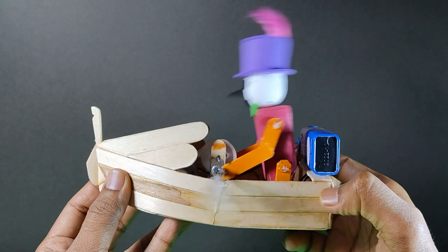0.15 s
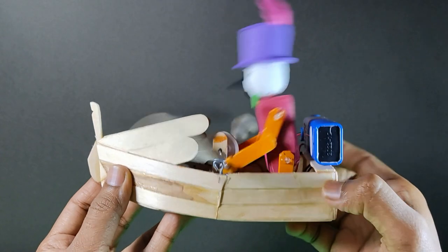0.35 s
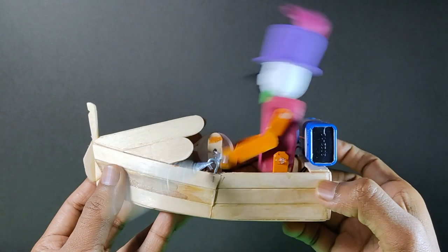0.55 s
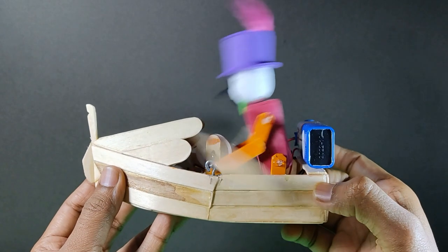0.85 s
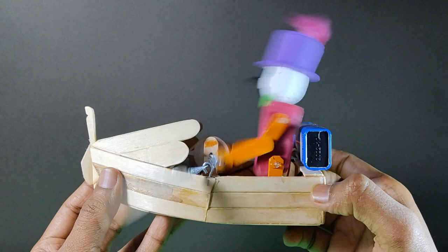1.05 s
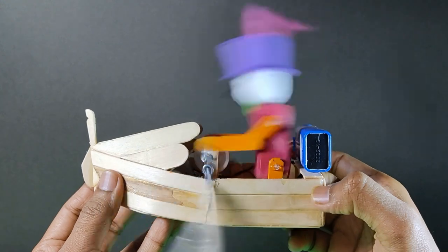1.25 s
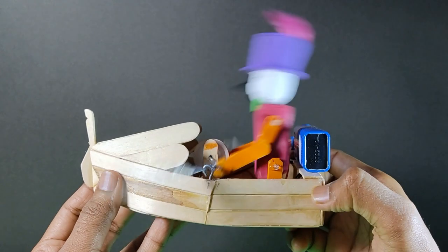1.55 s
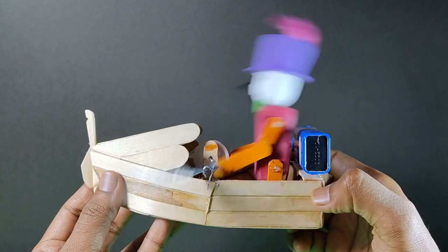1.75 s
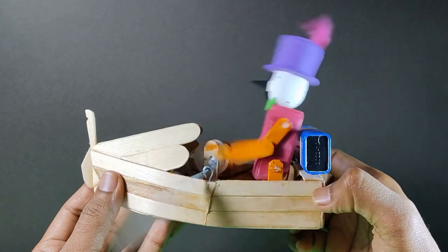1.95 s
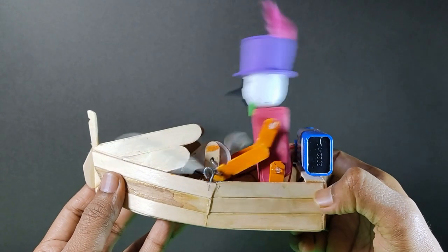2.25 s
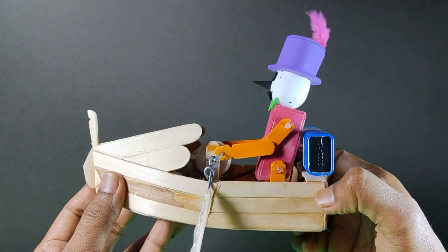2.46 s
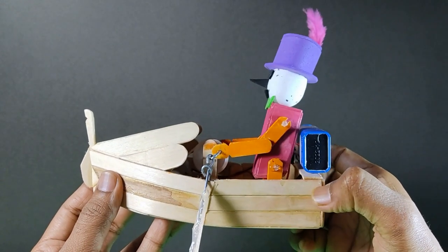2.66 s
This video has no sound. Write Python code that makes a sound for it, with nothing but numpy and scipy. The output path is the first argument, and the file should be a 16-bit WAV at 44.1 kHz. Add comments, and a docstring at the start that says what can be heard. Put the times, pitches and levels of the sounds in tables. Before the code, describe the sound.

After a brief quiet start, thin metallic ticks and light wooden knocks rattle about six times a second over soft low thuds, then cease, leaving faint room hiss; recorded close in a small room.

```python
"""A small room, with a wooden toy boat held in the hand before a microphone with two ports.
A small motor, a faint wavering hum, cranks a wire linkage that rows two paddles, then stops.
Twice a turn the loose joints chatter and tick: noise bursts, bare and through the ringing stick hull.
Arms and crank knock the hull's modes, and dull low thuds come as the paddles load it.
Random reflections make the room; the left port hears the toy 5 samples late, some 4 cm more path."""
import sys
import numpy as np
from scipy import signal
from scipy.fft import rfft, irfft
from scipy.io import wavfile
from scipy.ndimage import uniform_filter1d

SR = 44100
rng = np.random.default_rng(int(sys.argv[2]) if len(sys.argv) > 2 else 0)


def waveform_to_disk(signal):
    """Save audio, clipped to [-1, 1], as 16-bit WAV at the path in sys.argv[1]."""
    frames = np.transpose(np.atleast_2d(signal))
    scaled = np.clip(frames, -1, 1) * 32767
    samples = np.round(scaled).astype(np.int16)
    wavfile.write(sys.argv[1], SR, samples)


N = 123479


def amp(db):
    """Amplitude ratio of a level in dB."""
    return 10 ** (np.asarray(db) / 20)


def evened(x):
    """Scale to an RMS of 1."""
    return x / np.sqrt(np.mean(x ** 2) + 1e-20)


def smooth_noise(width):
    """Slow random drift of RMS 1: white noise averaged twice over width samples."""
    noise = rng.standard_normal(N)
    return evened(uniform_filter1d(uniform_filter1d(noise, width), width))


def read(points, hz):
    """Read a curve of (Hz, value) rows on a logarithmic frequency scale."""
    f, value = np.transpose(points)
    return np.interp(np.log(hz + 1), np.log(f + 1), value)


def colour(x, points, share=1):
    """Filter by a dB curve; minimum phase, so nothing sounds before its cause."""
    hz = abs(np.fft.fftfreq(4096, 1 / SR))
    log_gain = share * read(points, hz) * np.log(10) / 20
    response = np.exp(np.conj(signal.hilbert(log_gain)))
    taps = np.fft.ifft(response).real[:2048]
    return signal.oaconvolve(x, taps)[:N]


def lean(pair, points):
    """Tilt the stereo balance by a left-minus-right dB curve, half on each side."""
    return np.array([colour(pair[0], points, .5), colour(pair[1], points, -.5)])


def crossfade(hz):
    """Three steady cyclic gains, a third of a cycle apart, whose squares always add up to 1."""
    phase = hz * np.arange(N) / SR + np.arange(3)[:, None] / 3
    return np.cos(2 * np.pi * phase) * np.sqrt(2 / 3)


# Spectrum of the room air. Each row: frequency in Hz, relative density in dB.
AIR_SPECTRUM = [(12, -64), (20, 22.5), (32, -10.5), (65, -1), (158, -11), (248, -6.5), (293, -13),
                (337, -13), (872, -19.5), (1480, -15.5), (1800, -25), (2600, -21.5), (4410, -25.5),
                (7940, -10), (9930, -29), (16000, -68)]
# Likeness of the air at the two ports. Each row: frequency in Hz, correlation from 0 to 1.
AIR_LIKENESS = [(30, 0), (130, 0.9), (640, 0.26), (3000, 0.15)]
# Stereo balance of the air. Each row: frequency in Hz, left minus right in dB.
AIR_BALANCE = [(60, 1), (300, 6.5), (2000, 2), (6000, -7.5), (9000, -1)]
AIR_DB = -56  # RMS before the stereo balance


def air():
    """Quiet hiss and rumble of the room: shaped noise, more alike at the two ports where AIR_LIKENESS is high."""
    hz = np.fft.rfftfreq(N, 1 / SR)
    left, other = rfft(rng.standard_normal((2, N)))
    same = np.clip(read(AIR_LIKENESS, hz), 0, 1)
    right = same * left + np.sqrt(1 - same ** 2) * other
    noise = irfft(np.array([left, right]) * amp(read(AIR_SPECTRUM, hz)), N)
    return lean(amp(AIR_DB) * evened(noise), AIR_BALANCE)


# Low hum, likely the motor shaft. Each row: time in seconds, mean pitch in Hz, mean level in dB.
MOTOR_HUM = [(0.02, 163, -74), (0.13, 176.7, -79), (0.23, 169.4, -71), (0.44, 191.2, -79),
             (0.48, 183.2, -59.5), (0.57, 177, -84), (0.62, 176.7, -56.5), (0.73, 180.6, -63),
             (0.83, 178.2, -63), (1.1, 178.5, -68), (1.19, 166, -61), (1.26, 175, -78),
             (1.36, 173.9, -56.5), (1.46, 176.7, -72), (1.54, 171.2, -57), (1.599, 174.3, -84),
             (1.679, 188.6, -56), (1.76, 179.6, -76), (1.84, 185.7, -73), (1.87, 185.7, -49),
             (1.9, 178, -76), (1.999, 180.6, -70), (2.12, 177.3, -69), (2.27, 176.4, -65),
             (2.291, 173.3, -90), (2.369, 172, -62), (2.459, 183, -81), (2.52, 181.6, -66),
             (2.59, 174.2, -79), (2.78, 173, -73)]
HUM_WAVER_HZ, HUM_WAVER_DB = 8.9, 2.5  # RMS drift


def motor():
    """The shaft hum: one sine that wavers a little in pitch and level."""
    s, hz, db = np.transpose(MOTOR_HUM)
    t = np.arange(N) / SR
    pitch_drift, level_drift = smooth_noise(1000), smooth_noise(1000)
    pitch = np.interp(t, s, hz) + HUM_WAVER_HZ * pitch_drift
    level_db = np.interp(t, s, db) + HUM_WAVER_DB * level_drift
    return np.sqrt(2) * np.sin(2 * np.pi * np.cumsum(pitch) / SR) * amp(level_db)


# Modes of the stick hull. Each row: frequency in Hz, relative level in dB, 60 dB decay time in seconds.
HULL_MODES = [(463, -20, 0.072), (548.6, -27.5, 0.3), (661, -20.5, 0.16), (780.7, -19.5, 0.12),
              (1141.5, -6, 0.02), (1233, 4.5, 0.0096), (1400, -3.5, 0.021), (1496, 1, 0.014),
              (1843, -12, 0.047), (2130, -2, 0.015), (2536, -21.5, 0.11), (3000, -2, 0.0083),
              (3310, 4, 0.013), (3790, -1, 0.017)]
HULL_CUT_HZ = 687


def modes(t):
    """The hull's ring, one decaying sine a mode."""
    hz, db, t60 = np.transpose(HULL_MODES)[:, :, None]
    return amp(db - 60 * t / t60) * np.sin(2 * np.pi * hz * t)


def hull_cut(x):
    """Thin the lows of whatever sounds through the hull."""
    return signal.sosfilt(signal.butter(2, HULL_CUT_HZ, "high", fs=SR, output="sos"), x)


def hull(x):
    """Contacts land on ever different spots, each of which rings the modes in its own blend of signs."""
    ring = modes(np.arange(3000) / SR)
    spot = np.repeat(rng.integers(0, 8, N // 40 + 1), 40)[:N]  # a spot drawn every 40 samples
    blends = rng.choice([-1., 1.], (8, len(HULL_MODES))) @ ring / np.linalg.norm(ring)
    rung = sum(signal.oaconvolve(x * (spot == k), blend)[:N] for k, blend in enumerate(blends))
    return hull_cut(rung)


# Half turns of the crank, each a swell of chatter.
# Each row: start in seconds, hold in seconds, drive level in dB, hull drive against the bare drive in dB.
HALF_TURNS = [(0.226, 0.023, -67, 12), (0.352, 0.14, -31.5, -11.5), (0.559, 0.14, -38.5, -8.5),
              (0.721, 0.095, -31.5, -12.5), (0.907, 0.097, -29, -10), (1.088, 0.091, -32.5, -8),
              (1.248, 0.072, -26, -10), (1.417, 0.08, -30.5, -13.5), (1.58, 0.079, -37.5, -4.5),
              (1.771, 0.092, -32.5, -4.5), (1.952, 0.092, -32, -15), (2.146, 0.066, -33.5, -5.5),
              (2.304, 0.072, -28.5, -10.5), (2.487, 0.0093, -30.5, -1)]
RISE_S, FALL_DB_PER_S = 0.031, 338
LULL_S, LULL_WIDTH_S, LULL_DB = 0.064, 0.0098, -3  # slackens between the two jolts of a half turn


def swell():
    """Chatter level and hull share in dB: quick rise, hold with a lull, fall; the loudest swell wins."""
    t = np.arange(N) / SR
    start, hold, db, hull_db = np.transpose(HALF_TURNS)[:, :, None]
    since = t - start
    rise = 20 * np.log10(np.clip(since / RISE_S, 1e-4, 1))
    fall = FALL_DB_PER_S * np.maximum(since - hold, 0)
    lull = LULL_DB * np.exp(-((since - LULL_S) / LULL_WIDTH_S) ** 2)
    each = db + rise - fall + lull
    return each.max(0), hull_db[each.argmax(0), 0]


# Colour of the bare wire joints. Each row: frequency in Hz, gain in dB.
WIRE_COLOUR = [(60, -74.5), (150, -19), (300, -19.5), (600, -19.5), (1000, -11.5), (2500, -2.5),
               (4300, -7.5), (6000, -5), (9000, -6.5), (10500, -19), (11500, -25), (14000, -22.5),
               (16000, -32)]
CHATTER_PER_S, CHATTER_SPREAD_DB, CLUMP_DB = 1100, 7, 5


def chatter(level_db, hull_db):
    """Loose joints: random contacts in clumps, heard bare and through the hull."""
    strength = amp(CHATTER_SPREAD_DB * np.minimum(rng.exponential(1, N), 3))
    contacts = strength * (rng.random(N) < CHATTER_PER_S / SR) * rng.choice([-1., 1.], N)
    hits = evened(contacts * amp(CLUMP_DB * smooth_noise(160))) * amp(level_db)
    return colour(hits, WIRE_COLOUR) + hull(hits * amp(hull_db))


# Sharp ticks of the wire joints. Each row: start in seconds, relative level in dB.
WIRE_TICKS = [(0.164, -40), (0.2243, -27), (0.2352, -21.5), (0.239, -38), (0.251, -54), (0.2805, -19),
              (0.287, -57), (0.325, -33), (0.342, -34), (0.3752, -20), (0.392, -16.5), (0.412, -26),
              (0.424, -17), (0.432, -16.5), (0.445, -31), (0.4595, -17), (0.474, -25), (0.482, -41),
              (0.491, -42), (0.5532, -20), (0.5804, -25.5), (0.5936, -18), (0.605, -16.5), (0.613, -18),
              (0.648, -11), (0.67, -29), (0.6798, -21.5), (0.733, -23), (0.7637, -11), (0.7772, -16),
              (0.8119, -13.5), (0.8328, -22.5), (0.8417, -24), (0.898, -25), (0.9072, -26), (0.9297, -20.5),
              (0.9388, -17.5), (0.9458, -13), (0.9595, -15), (0.978, -34), (0.993, -25.5), (1.0114, -28),
              (1.045, -36), (1.0824, -20), (1.0997, -20), (1.115, -17.5), (1.1204, -14), (1.126, -13),
              (1.1621, -18), (1.166, -20), (1.18, -18.5), (1.19, -28.5), (1.2, -26), (1.2107, -40),
              (1.2859, -13.5), (1.2928, -21), (1.316, -31), (1.3398, -18.5), (1.366, -18.5),
              (1.3857, -22.5), (1.44, -37), (1.4552, -14), (1.462, -27), (1.4837, -19.5), (1.4955, -19.5),
              (1.5047, -17.5), (1.5324, -28), (1.5388, -25), (1.5772, -23), (1.598, -18), (1.615, -13.5),
              (1.6271, -15.5), (1.665, -14), (1.6845, -23), (1.722, -16.5), (1.765, -22.5), (1.7849, -27),
              (1.7935, -19), (1.802, -12), (1.8131, -17.5), (1.8521, -14), (1.8581, -18), (1.867, -42),
              (1.88, -24.5), (1.8876, -20.5), (1.9, -32), (1.9542, -26.5), (1.9798, -21), (1.9856, -21),
              (1.9959, -15), (2, -16.5), (2.0129, -14), (2.021, -37), (2.0377, -22), (2.0484, -14.5),
              (2.065, -30), (2.0892, -19.5), (2.1573, -28.5), (2.1621, -28), (2.175, -15), (2.1803, -20),
              (2.1915, -27), (2.2136, -20.5), (2.2216, -33), (2.2332, -22), (2.2518, -15), (2.328, -19),
              (2.3362, -14), (2.3493, -20), (2.361, -25), (2.3885, -12.5), (2.4041, -45), (2.4116, -23),
              (2.4245, -23), (2.4744, -20), (2.4941, -28), (2.5067, -11.5), (2.5264, -19), (2.542, -42),
              (2.7, -41), (2.7668, -43), (2.775, -56)]
TICK_S, TICK_DB, TICK_HULL_DB = 0.0012, -2, -13.5
BOUNCE_DB, BOUNCE_S = -13.5, 0.0076
LEAD_DB, LEAD_S, LOOSE_DB = -9.5, 0.0048, -39  # rattle round a tick, full once the chatter passes LOOSE_DB
DULL_HZ, DULL_DB, DULL_SPREAD_DB = 4800, -3.5, 2.5  # the part below DULL_HZ varies from tick to tick


def ticks(level_db):
    """Short bursts of contacts that rattle in and bounce out, some thin, some full; bare and through the hull."""
    out, t = np.zeros((2, N + 1800)), np.arange(-900, 900) / SR
    after = np.maximum(t, 0)
    bounce = amp(BOUNCE_DB) * np.exp(-after / BOUNCE_S) * np.minimum(after / (2 * TICK_S), 1) ** 2
    shape = np.exp(-(t / TICK_S - 1.5) ** 2) + bounce
    lead = amp(LEAD_DB) * np.exp(-abs(t) / LEAD_S)
    for s, db in WIRE_TICKS:
        at = round(s * SR)
        loose = amp(min(level_db[at] - LOOSE_DB, 0))
        contacts = np.sign(rng.standard_normal(1800))
        burst = amp(db + TICK_DB) * contacts * (shape + loose * lead)
        fullness = amp(DULL_DB + DULL_SPREAD_DB * rng.standard_normal())
        out[:, at:at + 1800] += [burst, fullness * burst]
    bright, dull = out[:, 900:N + 900]
    low_pass = signal.butter(2, DULL_HZ, fs=SR, output="sos")
    bare = bright + signal.sosfiltfilt(low_pass, dull - bright)
    return colour(bare, WIRE_COLOUR) + amp(TICK_HULL_DB) * hull(dull)


# Knocks of arms and crank on the hull.
# Each row: start in seconds, relative level in dB, frequency in Hz of the sticks nearest the blow.
HULL_KNOCKS = [(0.2254, -33, 1400), (0.2818, -42, 1480), (0.3231, -42, 1400), (0.3753, -32, 1520),
               (0.4232, -25.5, 1520), (0.4577, -27, 1370), (0.466, -23.5, 1310), (0.5185, -39, 1460),
               (0.5336, -48, 1270), (0.555, -49, 1330), (0.596, -28, 1340), (0.6065, -23.5, 1290),
               (0.6435, -29.5, 1380), (0.649, -19.5, 1380), (0.706, -52, 1420.0), (0.7648, -20, 1410),
               (0.8029, -53, 1320), (0.815, -21, 1240), (0.841, -36.5, 1405), (0.8527, -51, 1330.0),
               (0.8818, -37, 1330), (0.9499, -19.5, 1400), (0.9963, -43, 1390), (1.0856, -38, 1470.0),
               (1.115, -24.5, 1496), (1.123, -27.5, 1240), (1.1614, -22.5, 1400), (1.2271, -37, 1360),
               (1.2887, -25.5, 1300), (1.3255, -29, 1220), (1.3391, -26.5, 1240), (1.454, -19, 1443),
               (1.4992, -24, 1450), (1.5592, -35, 1280), (1.617, -21, 1410), (1.6674, -19.5, 1380),
               (1.7223, -36, 1360), (1.7998, -22.5, 1447), (1.853, -25, 1400), (1.8642, -30, 1390),
               (2, -17.5, 1456), (2.0365, -24.5, 1350), (2.045, -27.5, 1370), (2.0895, -36, 1280),
               (2.1157, -48, 1517), (2.1727, -23.5, 1260), (2.21, -36, 1364), (2.2245, -27, 1555),
               (2.2527, -31.5, 1275), (2.2714, -40, 1370), (2.341, -20, 1476), (2.3586, -50, 1400.0),
               (2.3776, -33, 1333), (2.405, -28.5, 1460), (2.4263, -33, 1520), (2.446, -39, 1526),
               (2.461, -36.5, 1314), (2.5022, -22, 1355), (2.543, -46, 1280), (2.5831, -44.5, 1354),
               (2.7034, -54, 1500), (2.767, -57, 1395)]
KNOCK_S, KNOCK_DB, NEAR_OCTAVES, FAR_DB = 0.0014, 8, 0.23, -8.5


def knocks():
    """Each knock rings the hull, most strongly the sticks it lands on."""
    out, t = np.zeros(N + 3000), np.arange(3000) / SR
    ring = modes(t) * (1 - np.exp(-t / KNOCK_S)) ** 2
    mode_hz = np.transpose(HULL_MODES)[0]
    for s, db, hz in HULL_KNOCKS:
        at = round(s * SR)
        near = np.exp(-(np.log2(mode_hz / hz) / NEAR_OCTAVES) ** 2)
        sign = rng.choice([-1., 1.], len(HULL_MODES))
        out[at:at + 3000] += amp(db + KNOCK_DB) * (sign * (near + amp(FAR_DB))) @ ring
    return hull_cut(out[:N])


# Dull thuds as the paddles load the hull. Each row: start in seconds, level in dB before the decay.
PADDLE_THUDS = [(0.422, -55), (0.652, -42.5), (0.813, -48), (0.957, -69), (1.15, -47), (1.286, -51),
                (1.339, -47), (1.492, -59), (1.616, -52), (1.664, -45), (1.813, -63), (1.852, -46),
                (1.994, -47), (2.059, -62), (2.175, -41), (2.384, -53)]
THUD_HZ, THUD_RISE_S, THUD_T60_S = 254, 0.0011, 0.051  # base pitch (each thud at 0.86 to 1.33 times it), onset time constant, 60 dB decay


def thuds():
    """Soft low pushes of the whole hull: decaying sines, each at its own pitch."""
    out, t = np.zeros(N + 4000), np.arange(4000) / SR
    for s, db in PADDLE_THUDS:
        at = round(s * SR)
        hz = THUD_HZ * rng.uniform(0.86, 1.33)
        tone = np.sin(2 * np.pi * hz * t) * (1 - np.exp(-t / THUD_RISE_S))
        out[at:at + 4000] += amp(db - 60 * t / THUD_T60_S) * tone
    return out[:N]


SCATTER_DB, SCATTER_T60_S, SCATTER_HZ = 0, 0.011, 2050


def scattered(x):
    """Short, dense random echoes, different at each port and crossfaded steadily, make the rattle wider."""
    t = np.arange(600) / SR
    echoes = rng.standard_normal((2, 3, len(t))) * amp(-60 * t / SCATTER_T60_S)
    echoes = signal.lfilter(*signal.butter(1, SCATTER_HZ, "high", fs=SR), echoes)
    echoes = echoes / np.linalg.norm(echoes, axis=2, keepdims=True)
    sent = (x * crossfade(4.1))[None]
    return amp(SCATTER_DB) * signal.oaconvolve(sent, echoes, axes=2)[:, :, :N].sum(1)


# Decay of the small room. Each row: frequency in Hz, 60 dB decay time in seconds.
ROOM_DECAY = [(200, 0.51), (1000, 0.3), (3000, 0.19), (8000, 0.22), (14000, 0.18)]
ROOM_DB = 3.5
TICK_ROOM_DB, KNOCK_ROOM_DB, LOW_ROOM_DB = -3.5, -11, -11  # sends to the room


def room(x):
    """Sparse random reflections, each band dying at its own speed.

    Three sets, crossfaded in a steady cycle, keep the tail's colour even."""
    taps = np.zeros((6, SR // 2))
    # one reflection in every 20 samples, after a gap of 120
    at = np.arange(120, SR // 2 - 20, 20) + rng.integers(0, 20, (6, (SR // 2 - 121) // 20))
    np.put_along_axis(taps, at, rng.choice([-1., 1.], at.shape), 1)
    hz, t, bands = signal.stft(taps, SR, nperseg=256)
    decay = amp(-60 * t / read(ROOM_DECAY, hz)[:, None])
    tail = signal.istft(bands * decay, SR, nperseg=256)[1]
    tail = tail / np.linalg.norm(tail[0])
    sent = np.tile(x * crossfade(7.3), (2, 1))
    wet = signal.fftconvolve(sent, tail, axes=1)[:, :N]
    return amp(ROOM_DB) * wet.reshape(2, 3, N).sum(1)


def resonate(x, hz, width):
    """A resonance of gain 1 at hz: shift hz down to zero, smooth with one pole, shift back."""
    turn = np.exp(2j * np.pi * np.cumsum(hz * np.ones(len(x))) / SR)
    r = np.exp(-np.pi * width / SR)
    return 2 * (turn * signal.lfilter([1 - r], [1, -r], x / turn + 1e-18)).real


# Stereo balance of the toy. Each row: frequency in Hz, left minus right in dB.
TOY_BALANCE = [(60, -12.5), (200, 10.5), (700, 5.5), (1300, 4), (2400, 2.5), (4400, 2.5), (6000, -1),
               (9000, 4), (12000, 4)]
# Microphone ports, left then right. Each row: resonance in Hz, width in Hz, level of the added ring in dB.
PORT_RINGS = [(9020, 1320, 2.5), (7990, 730, 19.5)]


def ports(pair):
    """The toy's balance at the microphone, with each port's own ring added."""
    pair = lean(pair, TOY_BALANCE)
    return np.array([x + amp(db) * resonate(x, hz, width) for x, (hz, width, db) in zip(pair, PORT_RINGS)])


LEFT_LAG = 5  # samples


def scene():
    """The toy, direct, in short echoes and in the room, through the ports, over the room air."""
    level_db, hull_db = swell()
    rattle, tick, knock = chatter(level_db, hull_db), ticks(level_db), knocks()
    low = thuds() + motor()
    toy = rattle + tick + knock + low
    sent = rattle + amp(TICK_ROOM_DB) * tick + amp(KNOCK_ROOM_DB) * knock + amp(LOW_ROOM_DB) * low
    direct = np.array([np.roll(toy, LEFT_LAG), toy])
    return ports(direct + scattered(rattle + tick) + room(sent)) + air()


def record(dry):
    """Soft overload, then a band limit at 15950 Hz."""
    soft = .85 * np.tanh(dry / .85)
    low_pass = signal.firwin(401, 15950, window=("kaiser", 11), fs=SR)
    return signal.oaconvolve(soft, low_pass[None], "same")


dry = scene()
out = record(dry)
waveform_to_disk(out)
```